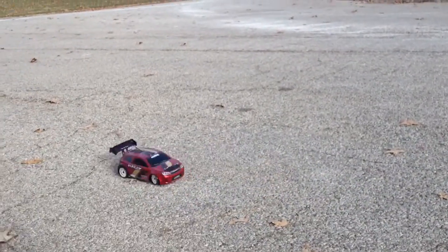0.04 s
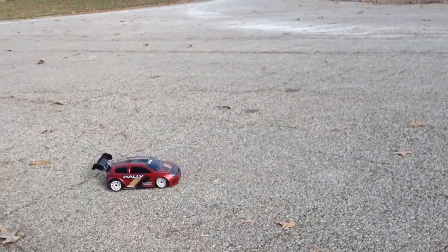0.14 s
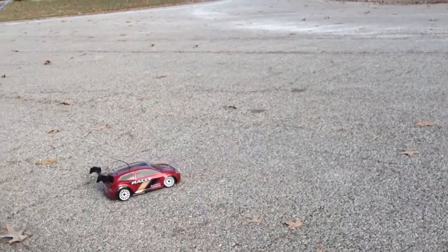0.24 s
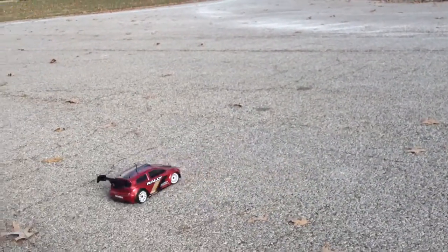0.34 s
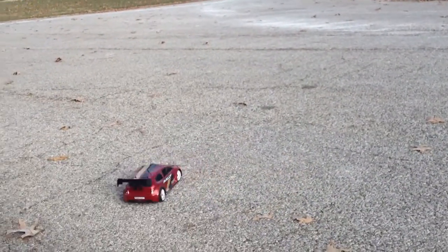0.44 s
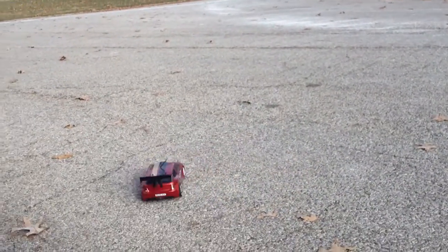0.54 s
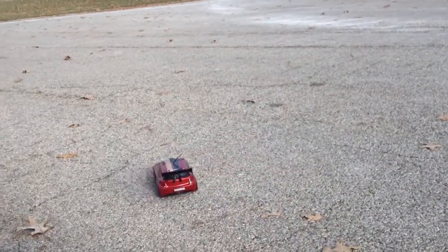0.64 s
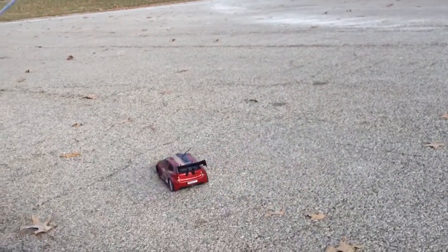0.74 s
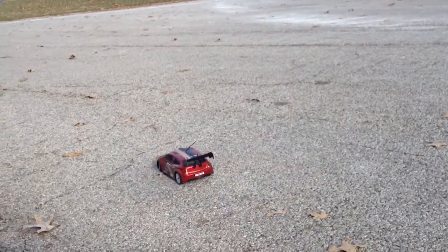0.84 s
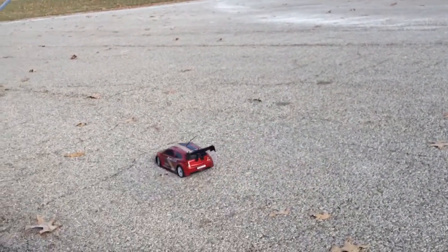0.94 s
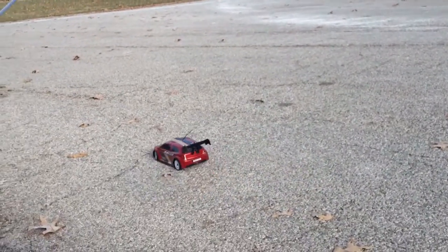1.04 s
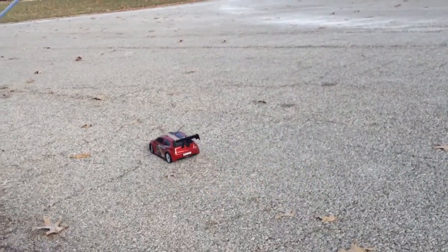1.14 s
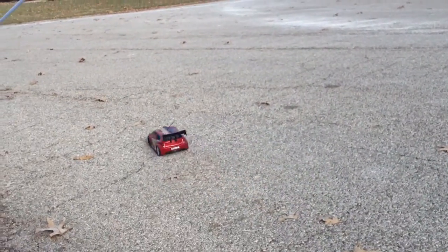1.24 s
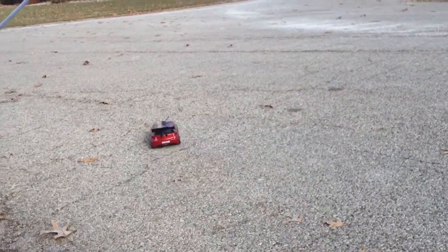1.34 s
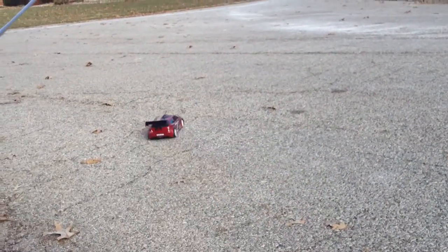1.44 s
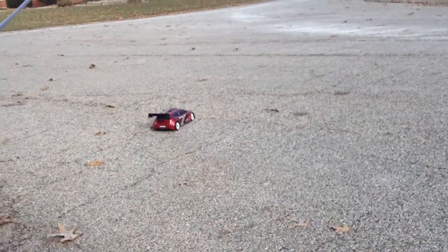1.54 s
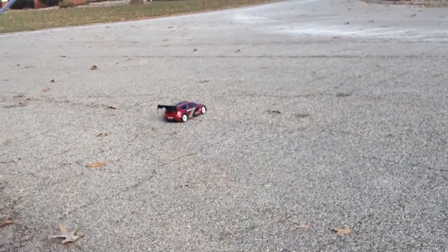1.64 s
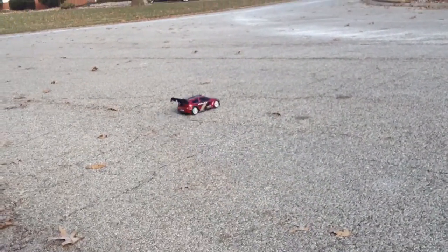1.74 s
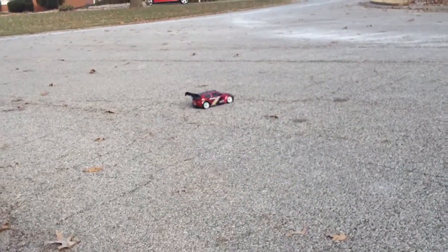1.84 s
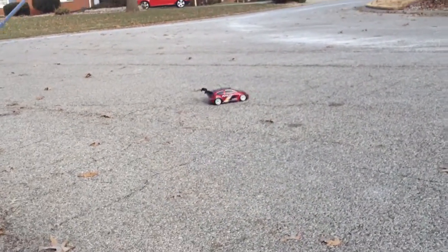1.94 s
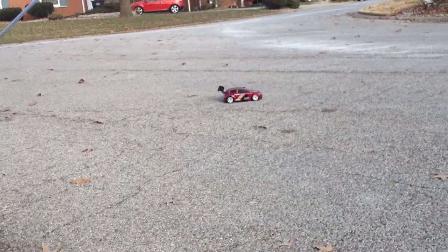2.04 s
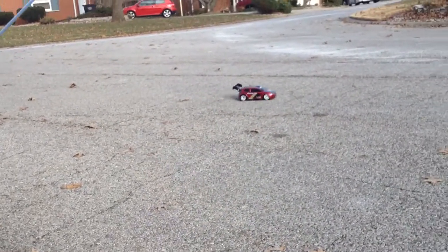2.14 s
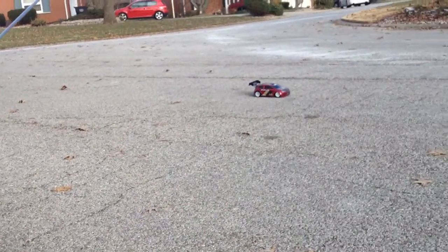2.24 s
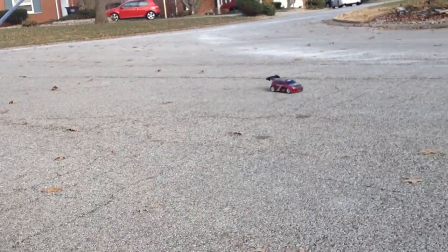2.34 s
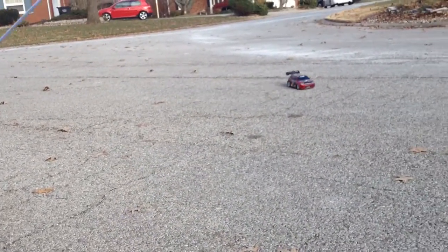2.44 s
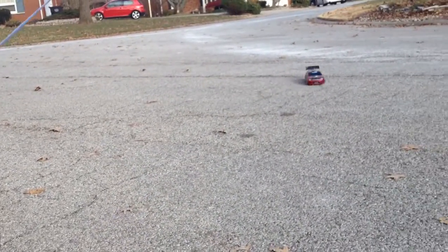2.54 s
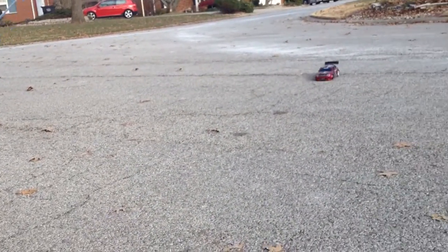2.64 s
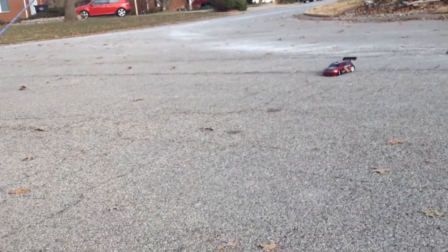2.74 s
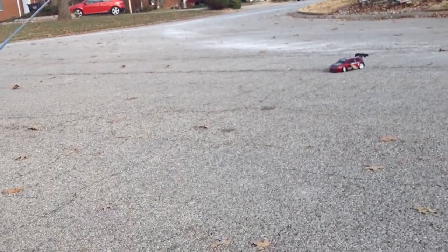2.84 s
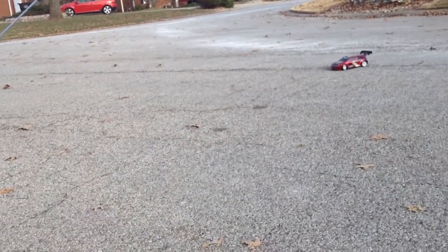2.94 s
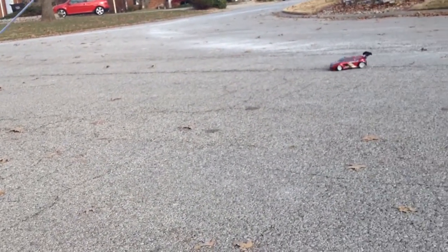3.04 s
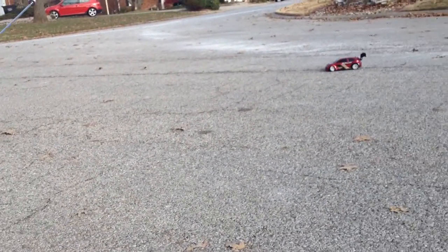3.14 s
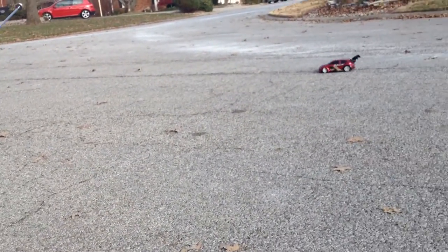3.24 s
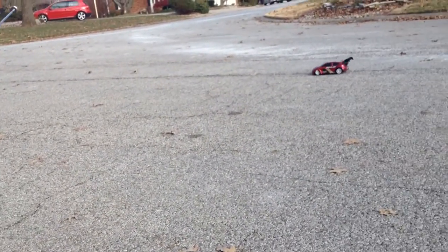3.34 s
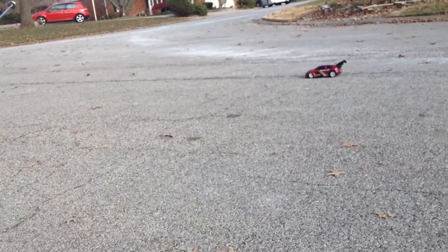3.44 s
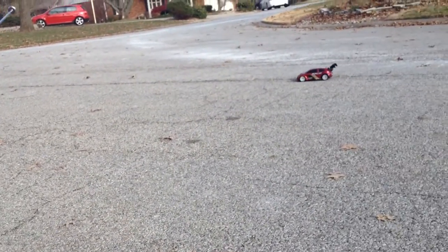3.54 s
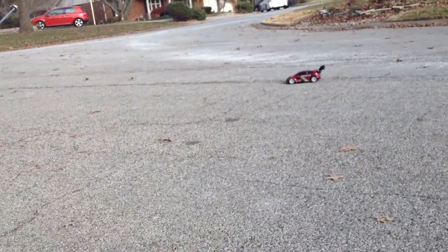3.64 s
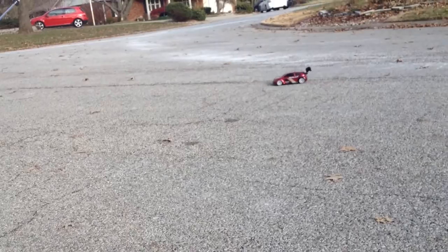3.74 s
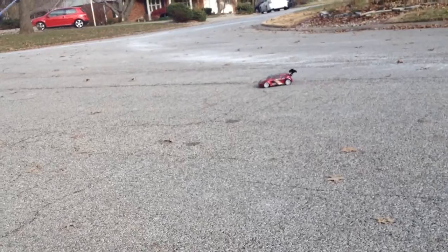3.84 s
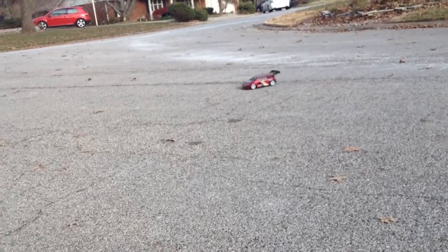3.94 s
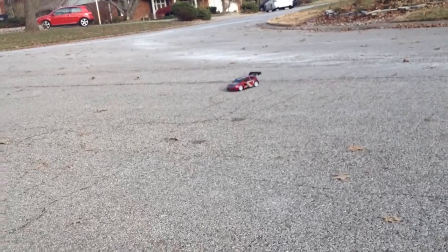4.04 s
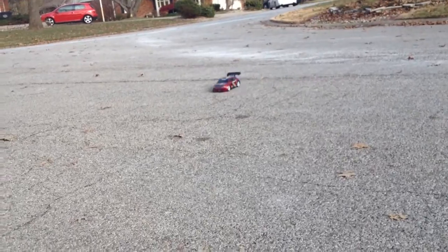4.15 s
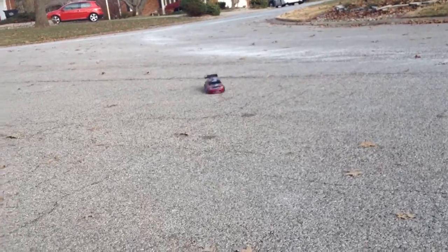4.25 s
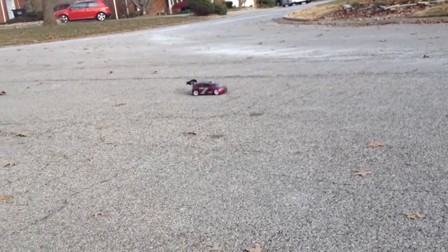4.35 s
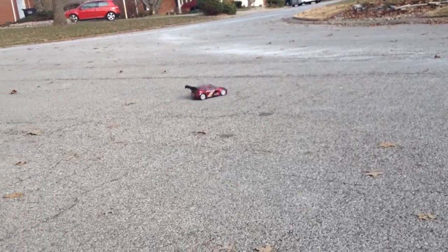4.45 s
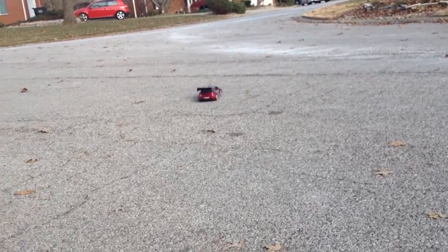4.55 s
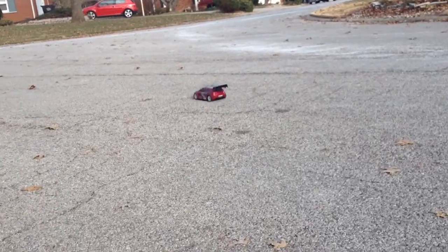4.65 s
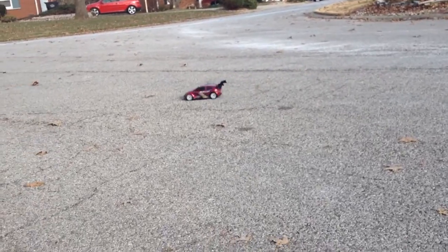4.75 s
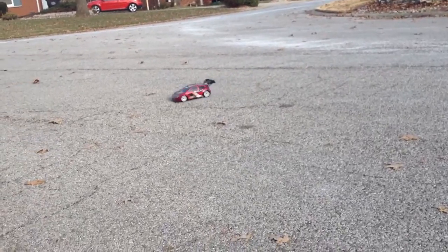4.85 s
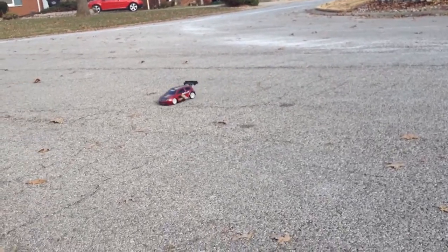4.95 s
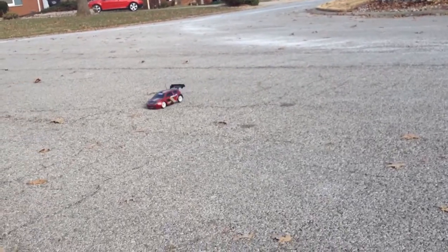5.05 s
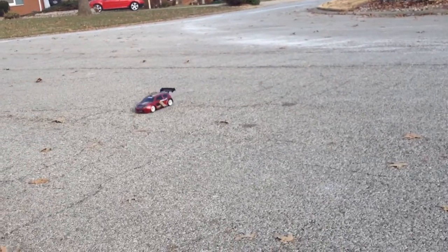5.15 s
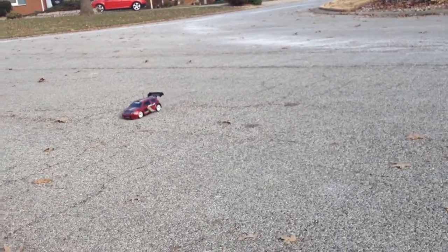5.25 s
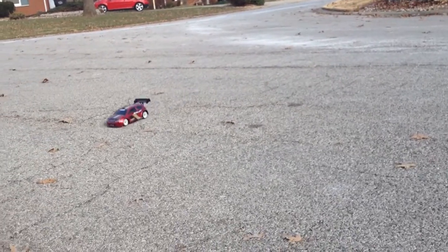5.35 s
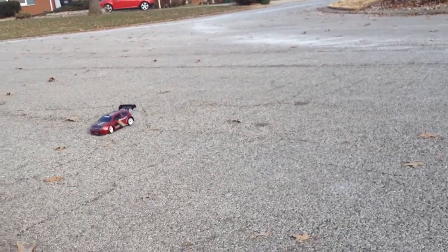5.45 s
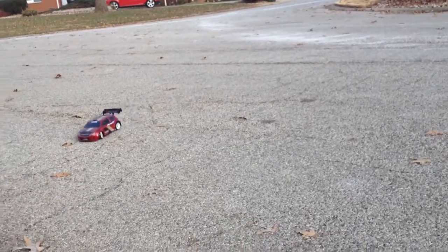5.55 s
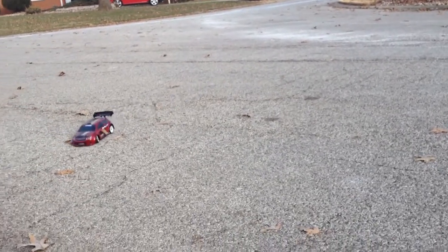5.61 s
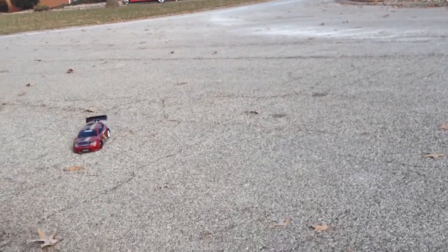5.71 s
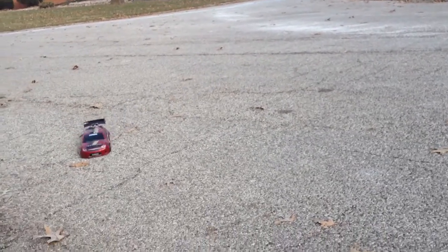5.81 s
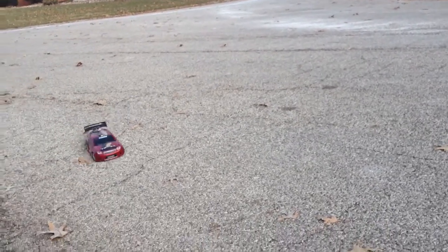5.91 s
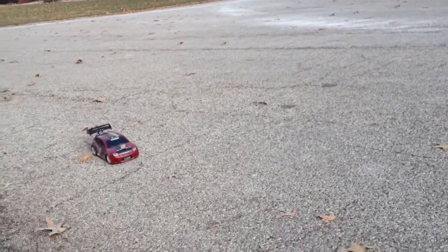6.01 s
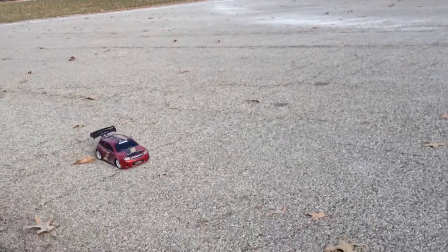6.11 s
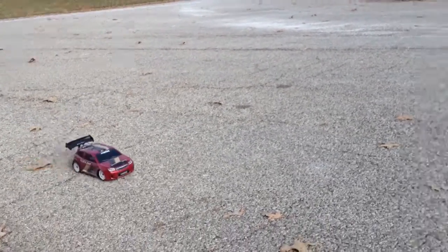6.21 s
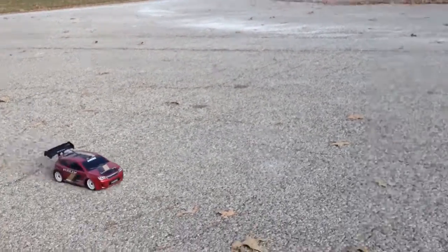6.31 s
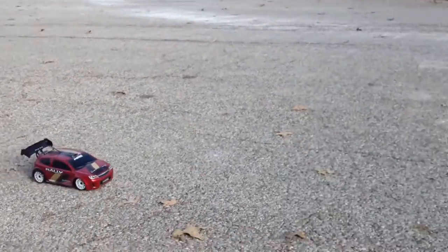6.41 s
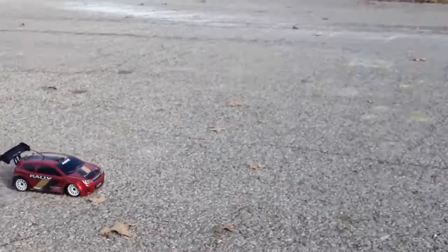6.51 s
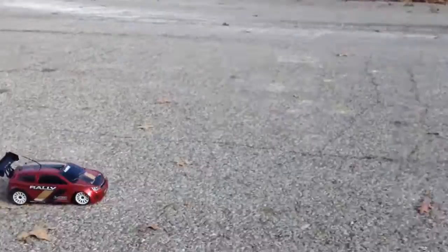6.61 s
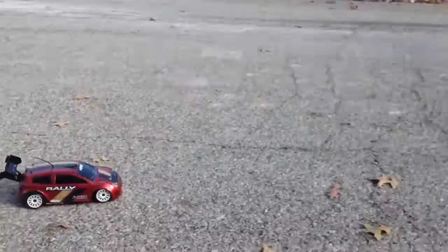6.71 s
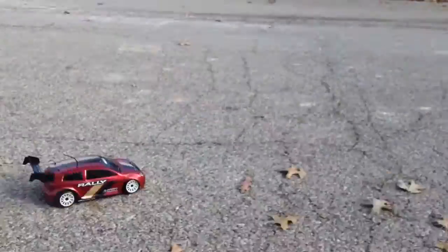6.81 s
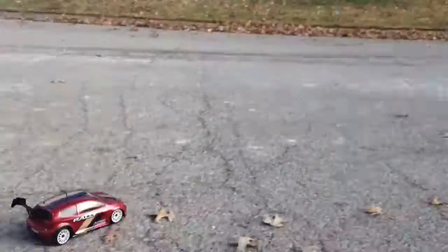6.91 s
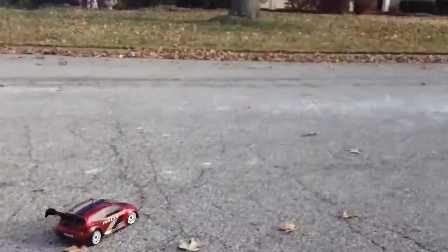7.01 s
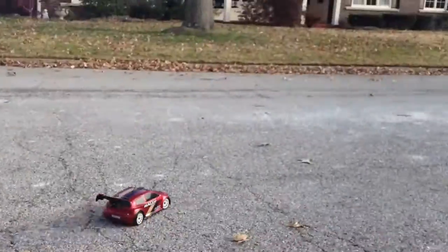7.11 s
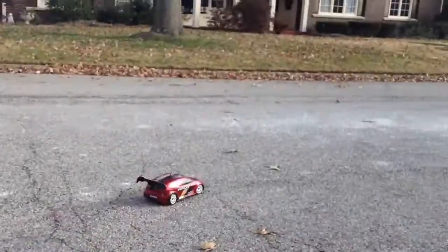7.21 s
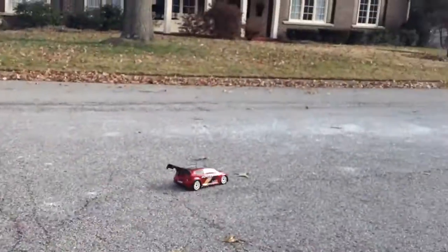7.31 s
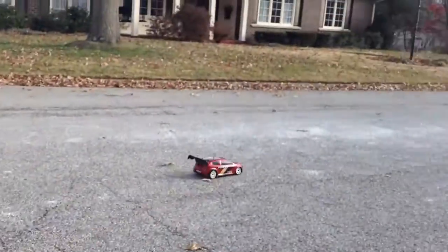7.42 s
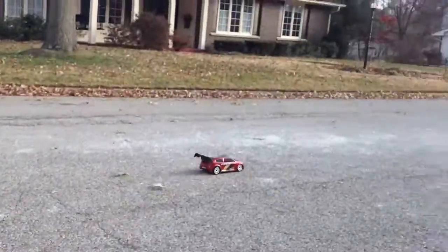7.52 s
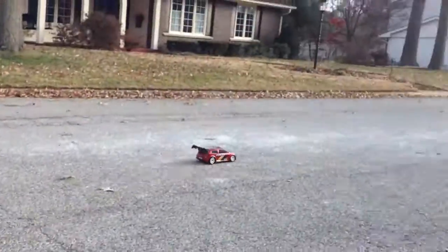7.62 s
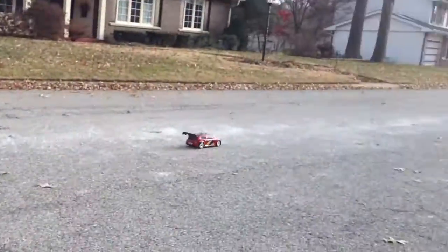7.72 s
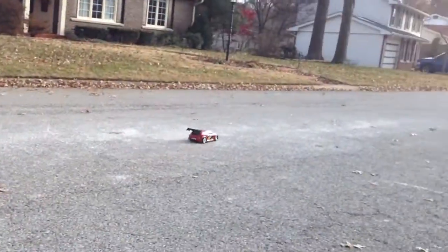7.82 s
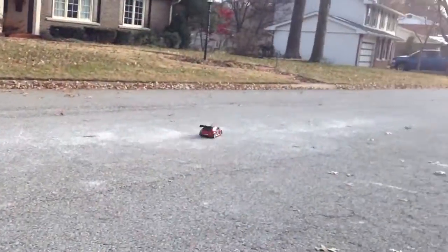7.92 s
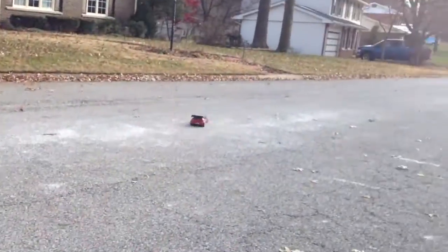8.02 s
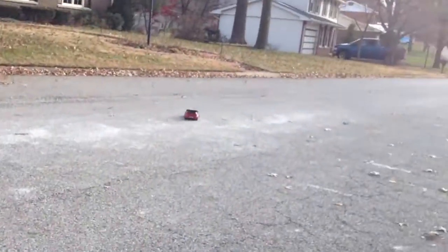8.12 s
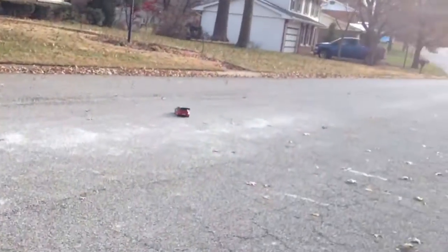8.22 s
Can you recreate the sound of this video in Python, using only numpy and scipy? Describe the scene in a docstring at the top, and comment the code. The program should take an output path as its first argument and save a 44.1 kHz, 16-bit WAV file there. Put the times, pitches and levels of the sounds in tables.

```python
"""A small electric model car drifts in loops on gravelly asphalt, over a faint outdoor hush.
It starts close by, tyres hissing and flinging grit, gears whining through a thin plastic shell and
pulsing as a drive shaft binds. By 3 s it is some metres off and its gears snatch again and again.
At 5 s the motor slows sharply, then the car just rolls with a low drone. Near 7 s it passes closest
in another spray of grit, then speeds away, its chassis knocking on bumps."""
import sys
import numpy as np
from scipy import signal
from scipy.fft import rfft, irfft
from scipy.io import wavfile
from scipy.ndimage import uniform_filter1d, map_coordinates

SR = 44100
rng = np.random.default_rng(int(sys.argv[2]) if len(sys.argv) > 2 else 0)


def materialize(psi):
    """Save the field psi as 16-bit PCM at rate SR to the path in sys.argv[1].

    A 1-D psi becomes a single channel; in a 2-D psi each row is a channel.
    """
    bounded = np.clip(np.atleast_2d(psi).T, -1, 1)
    quanta = np.round(bounded * 32767).astype(np.int16)
    wavfile.write(sys.argv[1], SR, quanta)


N = 364704
T = np.arange(N) / SR


# The gears' tones. Each row: multiple of the mesh rate (how often teeth meet), level in dB.
GEAR_TONES = [(2, 1), (3, -10.5), (4, 4.5)]
# How the hollow under the body rings. Each row: pitch in Hz, width in Hz, level in dB.
CABIN_RINGS = [(1778, 240, 4), (1918, 154, 8), (2070, 350, 2.5), (2400, 470, 3.5)]
# How the plastic shell rings. Each row: pitch in Hz, width in Hz, level in dB.
SHELL_RINGS = [(2610, 180, -1), (3615, 590, 2.5), (4110, 290, 4), (4360, 340, 7), (4587, 810, 2)]

def gears(teeth, pressure, cabin_db, whine_db):
    """Meshing teeth sing under pressure and slap when slack; both ring the cabin and the shell."""
    # each tone flickers as the gears shift on their shafts, and swells and fades as the body turns
    mesh = sum(undb(db + 0.71 * walk(35) + 3.2 * walk(10)) * tone(teeth, k, rough=1.3, rough_rate=400)
               for k, db in GEAR_TONES)
    mesh = highpass(mesh, 3000, order=4)  # the small gearbox passes on little of the low tones
    slaps = rng.standard_normal(N) * (1 + 0.5 * np.cos(2 * np.pi * teeth))
    # play between the teeth smears the two lowest tones over the cabin's pitches
    backlash = tone(teeth, 1, rough=1.9, rough_rate=400)
    backlash += undb(-2.5) * tone(teeth, 2, rough=1.1, rough_rate=500)
    cabin = ring(pressure * backlash + undb(-1.5) * slaps, CABIN_RINGS)
    shell = ring(pressure * mesh + undb(7) * slaps, SHELL_RINGS)
    return undb(cabin_db) * cabin + undb(whine_db) * shell


# Throttle or brake loads the gears. Each row: start and end in seconds, change of pressure in dB.
GEAR_LOADS = [(-.1,.14,2),(.4,.95,-3),(2.78,3.04,6.5),(4.08,4.62,2.5),(4.76,4.98,6),(5.25,5.5,3),(6.2,6.41,6),(6.55,7.12,2),(7.45,8.4,-4.5)]

def gear_drive(speed_db, drift_db, flank):
    """Tooth pressure and gear levels: the cabin is loudest from the side, the whine from the ends."""
    pull_db = spells(GEAR_LOADS, ramp_s=0.058)
    # each walk sways the level by about 1 dB as the car wags on its springs
    cabin_db = -57 + drift_db + 0.24 * speed_db + 16.5 * flank + walk(9)
    whine_db = -42 + drift_db + 0.76 * speed_db - 6 * flank + 0.77 * pull_db + walk(9)
    return undb(pull_db - 3.5), cabin_db, whine_db


# Each row: start and end in seconds, multiple of the mesh rate, level in dB.
SINGING_TONES = [(-.1,0.131,2,-36),(.22,0.375,2,-45.5),(.5,.6,2,-48),(1.045,1.27,4,-51.5),(1.742,2.034,2,-52),(1.46,1.9,4,-60),
                 (2.475,2.89,2,-51),(2.917,3.05,2,-52.5),(2.96,3.675,1,-51),(3.268,3.601,2,-53.5),(4.082,4.317,2,-50.5),(5.152,5.294,3,-54),
                 (5.282,5.496,2,-53),(5.7,6,3,-66),(6.004,6.197,3,-52.5),(6.185,6.345,2,-46.5),(6.53,6.801,2,-52.5),(6.884,7.75,2,-52)]

def singing(teeth):
    """Single gear tones stand out as the body turns, fluttering as the shafts shift."""
    multiples = sorted({round(row[2]) for row in SINGING_TONES})
    tones = {k: tone(teeth, k, rough=1.25, rough_rate=270) for k in multiples}
    flutter = even(undb(1.6 * walk(60)))
    return flutter * sum(undb(db) * gate(start, end, ramp_s=0.019) * tones[round(k)]
                         for start, end, k, db in SINGING_TONES)


# Panels that ring out. Each row: start and end in seconds, pitch in Hz, width in Hz, level in dB.
PANEL_FLARES = [(-.1,.24,3120,300,-53),(0.402,0.787,4000,330,-47),(0.497,.95,2600,260,-57),(0.802,1.382,4060,280,-56),(1.396,1.778,3914,170,-52.5),(5.4,6.103,3500,200.2,-60.5),(6.544,6.8,4583,300,-51),(6.82,8.14,3977,200,-55)]

def flares():
    """As the body turns and flexes, one shaken panel or another rings at its own pitch."""
    shaking = rng.standard_normal(N)
    return sum(undb(db) * gate(start, end, ramp_s=0.045) * unit(steep_band(shaking, hz, width, 2))
               for start, end, hz, width, db in PANEL_FLARES)


# The teeth's high overtones. Each row: multiple of the mesh rate, level in dB.
RASP_TONES = [(4, -0.5), (6, -2.5), (8, 1)]
# How well the gearbox gives them off. Each row: frequency in Hz, level in dB.
GEARBOX_COLOUR = [(4200, -2), (5200, 2), (7000, 5.5), (8800, 7), (10000, -1), (15000, -5)]

def rasp(teeth):
    """The high overtones of the teeth, smeared into a gritty sizzle."""
    overtones = sum(undb(db + 3.5 * walk(70)) * tone(teeth, k, rough=2, rough_rate=850)
                    for k, db in RASP_TONES)
    return colour(overtones, GEARBOX_COLOUR)


def rotor(teeth, speed, rumble_db):
    """The rotor hums nearly an octave under the mesh, its unbalance growing with speed."""
    return undb(rumble_db - 12) * speed ** 2 * tone(teeth, 0.55, rough=0.99, rough_rate=120)


# The drive shaft follows its wheel's own pace. Each row: time in seconds, turns a second.
SHAFT_RATE = [(0,71),(.55,52.4),(1,47),(1.45,35.5),(1.85,58),(2.05,39),(2.3,27),(2.75,47),(3,40.5),(3.35,30),(3.7,22.8),(4,38),(4.6,60),(4.9,42),(5.5,33),(6.75,29),(6.95,45.6),(8.27,55)]

def binds():
    """The shaft sticks and lets go once a turn, giving short pulses of uneven strength."""
    rate, = curves(SHAFT_RATE)
    turns = np.cumsum(rate * (1 + 0.025 * walk(25.12))) / SR
    strength = undb(3.5 * np.clip(rng.standard_normal(1000), -2, .5))
    width_turns = 0.13
    return strength[turns.astype(int)] * np.exp(-.5 * ((turns % 1 - .5) / width_turns) ** 2)


# The gears grab hard as the load turns over. Each row: time in seconds, strength in dB.
GEAR_SNATCHES = [(.065,6.5),(2.983,7),(3.163,13),(3.222,11),(3.315,11),(3.461,9),(3.539,12),(3.582,12.5),(3.626,11.5),(3.671,17),(4.299,12),(4.395,9),(4.762,8),(4.798,5),(4.836,10),(4.914,10.5),(4.959,11.5),(6.778,11.5),(6.97,8),(7.018,12.5),(7.051,10)]

def snatches():
    """Each snatch gives a brief lift, a slack spell around it and a clack just before the teeth bite."""
    half_s, lift_s, slack_s, clack_s = 0.05, 0.0034, 0.02, 0.003
    t = np.arange(-half_s, half_s, 1 / SR)
    lift_db = strikes(GEAR_SNATCHES, np.exp(-.5 * (t / lift_s) ** 2), half_s)
    slack = strikes([(s, 1) for s, _ in GEAR_SNATCHES], np.exp(-(t / slack_s) ** 4), half_s)
    decay = np.exp(-(t + half_s) / clack_s)
    hits = strikes([(s, undb(db)) for s, db in GEAR_SNATCHES], decay, lead_s=0.0033)
    clacks = undb(-50) * hits * colour(rng.standard_normal(N), HISS_COLOUR)
    return lift_db, np.minimum(slack, 1), clacks


# The tyres' bright hiss and the road's low rumble. Each row: frequency in Hz, level in dB.
HISS_COLOUR = [(150, -37), (900, -51), (1500, -8), (2800, 4), (5200, 2), (6500, 2.5), (8500, 0.5),
               (10500, -6), (14000, -7), (15500, -12.5)]
RUMBLE_COLOUR = [(40, -74), (90, -41), (150, -4.5), (250, 0), (390, -6.5), (590, 6.5), (780, 1),
                 (1050, 2.5), (1400, 1.5), (2200, -1), (4000, -11.5), (12000, -20.5)]

def tyres(speed, hiss_db, rumble_db, scuff):
    """Hard tyres scrape over grit, more stones a second at speed; the rough road drums the chassis."""
    scrape = rng.standard_normal(N) + undb(-3) * grit(2500 * speed, spread_db=1.5)
    drumming = rng.standard_normal(N) + undb(-3) * grit(900 * speed, spread_db=2.2)
    hiss = undb(hiss_db) * colour(scrape, HISS_COLOUR) * unit(scuff ** 1.54)
    rumble = undb(rumble_db) * colour(drumming, RUMBLE_COLOUR) * unit(scuff ** 1.2)
    return hiss + rumble


# Bumps in the road. Each row: time in seconds, thud level in dB, crack level in dB, thud pitch in Hz.
ROAD_BUMPS = [(2.014, -30, -38, 995), (2.804, -47, -42, 1203), (2.822, -37, -30, 323),
              (4.205, -41.5, -53, 556), (4.298, -36, -47, 249.4), (4.309, -31, -31.5, 636),
              (4.774, -30.5, -34, 834), (5.467, -39.5, -37, 598), (5.61, -42.5, -41, 298.4),
              (6.308, -35.5, -40, 401), (6.368, -24, -18.5, 895), (6.471, -37.5, -47, 360.8),
              (6.594, -37.5, -34, 312.7), (7.286, -29, -26, 1203), (7.311, -29.5, -28.5, 487),
              (7.939, -35, -34, 644), (7.957, -18.5, -24.5, 914), (7.993, -40, -32, 1300),
              (8.060, -34.5, -50, 650)]
# How the chassis rings. Each row: pitch in Hz, level in dB, seconds to fade by 60 dB.
CHASSIS_RINGS = [(295, -9.5, 0.041), (462, -6.5, 0.087), (630, -7, 0.083), (954, -0.5, 0.018),
                 (1130, -8.5, 0.078), (1430, 5, 0.0046), (2180, 15.5, 0.0025)]

def bumps():
    """Each blow rings the chassis most near its own pitch and sets the plastic shell clattering."""
    rise_s, crack_s, clatter_s, db_per_octave = 0.00058, 0.0032, 0.016, 9
    out, t = np.zeros(N + SR), T[:SR // 5]
    crack_band = signal.butter(1, [1500, 5500], "band", fs=SR, output="sos")
    onset = 1 - np.exp(-t / rise_s)  # the springs soften the contact
    decay = np.exp(-t / crack_s) + undb(-7.5) * np.exp(-t / clatter_s)
    for s, thud_db, crack_db, pitch_hz in ROAD_BUMPS:
        thud = np.zeros(len(t))
        for k, (hz, db, fade_s) in enumerate(CHASSIS_RINGS):
            detune = 1 + 0.09 * rng.standard_normal()
            gain = (-1) ** k * undb(db - db_per_octave * abs(np.log2(hz / pitch_hz)))
            thud += gain * np.sin(2 * np.pi * hz * detune * t) * undb(-60 * t / fade_s)
        crack = signal.sosfilt(crack_band, rng.standard_normal(len(t))) * onset * decay
        blow = undb(thud_db) * thud / abs(thud).max() + undb(crack_db) * crack / abs(crack).max()
        start = int(s * SR)
        out[start:start + len(t)] += blow
    return highpass(out[:N], 170, order=2)  # so small a body gives off no deep bass


# Wheelspins close by. Each row: start and end in seconds, level in dB.
WHEELSPINS = [(-.1, 0.464, -50.5), (6.587, 7.446, -48)]

def spray():
    """Spinning wheels fling fine grit in a bright crackle."""
    crackle = unit(highpass(grit(6000, spread_db=.5), 9000, order=2))
    return crackle * sum(undb(db) * gate(start, end, ramp_s=0.19) for start, end, db in WHEELSPINS)


# Stones flicked against the shell. Each row: time in seconds, level in dB.
STONE_HITS = [(5.966,-41),(6.198,-42),(6.34,-29),(7.455,-33),(7.499,-29)]

def stones():
    """Single stones strike the shell with bright, dry ticks."""
    decay_s, pitch_hz = 0.0018, 8800
    ticks = strikes([(s, undb(db)) for s, db in STONE_HITS], np.exp(-T[:SR // 20] / decay_s), lead_s=0)
    return ticks * band(rng.standard_normal(N), pitch_hz, pitch_hz / 2)


# How the loose panels ring. Each row: pitch in Hz, width in Hz, level in dB.
LOOSE_PANELS = [(1518, 110, 0), (2320, 120, -0.5), (3360, 440, 0.5), (4005, 410, 3)]

def rattle(metres, flank):
    """Stones under the tyres shake the loose panels, which ring at their own pitches at any speed."""
    shaking = grit(900, spread_db=-1) + rng.standard_normal(N)
    panels = sum(undb(db) * steep_band(shaking, hz, width, 3) for hz, width, db in LOOSE_PANELS)
    return undb(-50.5 - 5 * flank) * unit(panels) / metres


def metal(metres, flank, speed):
    """The shaking drive train keeps one thin metal ring alive, heard best at speed and from the side."""
    ringing = steep_band(rng.standard_normal(N), hz=1706, width_hz=14.3, skirt=4)
    return undb(-62 + 9.5 * flank) * unit(ringing) * speed ** 2 / metres


# Between drifts the car just rolls. Each row: start and end in seconds, change of gears and hiss in dB.
ROLLING = [(4.933,6.198,-5.5)]
ROLL_RAMP_S = 0.35

def drone(metres):
    """While the car rolls, its gripping tyres drum low on the rough road."""
    rolling = sum(gate(start, end, ROLL_RAMP_S) for start, end, _ in ROLLING)
    road = rng.standard_normal(N) + grit(150, spread_db=3)
    drum = steep_band(road, hz=299.7, width_hz=186, skirt=2)
    return undb(-58) * unit(drum) * rolling / metres


# The first echo shifts as the car moves. Each row: time in seconds, delay in milliseconds.
ECHO_DELAY = [(0, 1.235), (2.3, 1.22), (5.1, 1.28), (5.65, 1.2), (6.6, 1.2), (7, 0.92), (8.27, 0.87)]

def reflections(car, metres):
    """Quick echoes colour the sound as the car moves; house fronts add a thin tail."""
    lag_ms, = curves(ECHO_DELAY)
    # sound bounces between chassis and road, on a path that changes as the car turns
    car = car + undb(-11.5) * echo(car, 0.5436 + 0.11 * walk(2))
    echoes = undb(-10) * echo(car, lag_ms) + undb(-12.5) * echo(car, lag_ms + 2.3)
    share = np.minimum(metres / 2.6, 1)  # close by, the direct sound outweighs the echoes
    t = T[:SR]
    tail = signal.lfilter(*signal.butter(1, 4000, fs=SR), rng.standard_normal(SR))
    tail *= undb(-60 * t) * (t > .03)  # starts after 30 ms, fades 60 dB in a second
    street = signal.fftconvolve(car, tail / np.linalg.norm(tail))[:N]
    return car + share * echoes + undb(-19) * street


# The outdoor hush and the traffic's low hum. Each row: frequency in Hz, level in dB.
HUSH_COLOUR = [(25, -38), (85, -18.5), (125, -6), (170, 0), (400, -11), (1000, -12.5), (15000, -55)]
HUM_COLOUR = [(40, -60), (108, -1), (200, -35.5)]
# Far traffic swells and fades. Each row: time in seconds, level in dB.
TRAFFIC_LEVEL = [(0, -71.5), (1.5, -70), (2.3, -80), (4, -82), (7.1, -74), (8.27, -87)]

def outdoors():
    """A soft hush and the hum of far traffic."""
    hum_db, = curves(TRAFFIC_LEVEL)
    hush = undb(-64 + walk(2.8)) * colour(rng.standard_normal(N), HUSH_COLOUR)
    return hush + undb(hum_db) * colour(rng.standard_normal(N), HUM_COLOUR)


def tone(teeth, multiple, rough, rough_rate):
    """A tone that follows the gears; uneven teeth and the play between them roughen it."""
    phase = 2 * np.pi * multiple * teeth
    return unit((1 + rough * walk(rough_rate)) * np.sin(phase) + rough * walk(rough_rate) * np.cos(phase))


def ring(x, rings):
    """A part of the body rings with whatever shakes it, at a steady level."""
    return even(sum((-1) ** k * undb(db) * band(x, hz, width) for k, (hz, width, db) in enumerate(rings)))


def grit(rate, spread_db):
    """Clicks of stones met at random, rate a second, some harder than others."""
    hit = rng.random(N) < rate / SR
    size = undb(spread_db * np.minimum(rng.exponential(size=N), 5))
    return unit(hit * size * rng.standard_normal(N))


def undb(db):
    """Turn decibels into a gain."""
    return 10 ** (np.asarray(db) / 20)


def unit(x):
    """Scale to an average (rms) level of 1."""
    return x / np.sqrt(np.mean(x ** 2))


def even(x):
    """Hold the level at 1 over every eighth of a second, keeping the faster flutter."""
    return x / np.sqrt(uniform_filter1d(x ** 2, SR // 8) + 1e-12)


def curves(table):
    """Join a time table's points with lines, one curve for each column after the time."""
    times, *columns = np.transpose(table)
    return [np.interp(T, times, column) for column in columns]


def walk(rate):
    """A smooth random wobble of size 1, changing about rate times a second."""
    knots, times = rng.standard_normal(N // 8), np.linspace(0, T[-1], N // 10)
    return unit(np.interp(T, times, map_coordinates(knots, [times * rate], order=2)))


def gate(start, end, ramp_s):
    """Ramp up to 1, hold, ramp down."""
    return np.clip(np.minimum(T - start, end - T) / ramp_s + .5, 0, 1)


def spells(table, ramp_s):
    """The dB of each (start, end, dB) row while it lasts."""
    return sum(db * gate(start, end, ramp_s) for start, end, db in table)


def strikes(rows, shape, lead_s):
    """A copy of the shape for each (seconds, size) row, starting lead_s early."""
    out = np.zeros(N + SR)
    for s, size in rows:
        start = max(int((s - lead_s) * SR), 0)
        out[start:start + len(shape)] += size * shape
    return out[:N]


def colour(x, points):
    """Shape lows and highs along (Hz, dB) points, then scale to level 1."""
    hz, db = np.transpose(points)
    freqs = np.maximum(np.fft.rfftfreq(N, 1 / SR), 1)
    return unit(irfft(rfft(x) * undb(np.interp(np.log(freqs), np.log(hz), db)), N))


def band(x, hz, width_hz):
    """Keep the sound around one pitch."""
    return signal.lfilter(*signal.iirpeak(hz, hz / width_hz, fs=SR), x)


def steep_band(x, hz, width_hz, skirt):
    """A band with its edges trimmed by a second one, skirt times as wide."""
    return band(band(x, hz, width_hz), hz, skirt * width_hz)


def highpass(x, hz, order):
    """Keep the sound above hz."""
    return signal.sosfilt(signal.butter(order, hz, "high", fs=SR, output="sos"), x)


def echo(x, lag_ms):
    """A copy that arrives later by a moving delay."""
    return map_coordinates(x, [(T - lag_ms / 1000) * SR], order=3)


# The motor's speed. Each row: time in seconds, mesh rate in Hz.
MESH_RATE = [(0,1990),(.28,2020),(.5,1620),(.78,1363),(1.08,1215),(1.42,1087),(1.62,1245),(1.75,1500),(2,1930),(2.5,2260),(2.78,2298),(2.9,2162),(2.93,1975),(3.45,1920),(3.75,1700),(3.97,1665),(4.12,1850),(4.26,1907),(4.35,1804),(4.58,2222),(4.79,2028),(4.91,1180),(5,620),(5.13,1220),(5.43,1950),(5.72,1500),(6.03,1325),(6.13,1400),(6.39,2396),(6.46,1047),(6.66,1590),(6.8,1785),(7.05,2115),(7.55,2385),(7.9,2416),(8.27,2660)]
# The car's loops. Each row: time in seconds, distance in metres, flank (0 nose-on, 1 side-on).
LOOPS = [(0,1.5,0.13),(.32,1.28,0.83),(.6,1.44,0),(1.06,1.35,0.73),(1.55,1.67,0.22),(2.1,2,0.69),(2.45,3.06,0.06),(2.75,3.3,0),(2.98,3.6,0.7),(4.03,2.88,0.98),(4.25,2.5,0.17),(4.6,2.12,0.6),(4.85,2.4,0.72),(5.45,2.76,0.48),(5.9,2.5,0.32),(6.4,1.57,0.15),(6.77,0.87,0.97),(6.9,0.83,0.3),(7.12,1.12,0.33),(7.5,1.74,0.32),(7.95,2.55,0.15),(8.27,3.8,0.25)]
# Cracked road drums the chassis harder. Each row: start and end in seconds, extra rumble in dB.
CRACKED_ROAD = [(6.25, 8.05, 2)]

def scene():
    """The motor speed drives gears and tyres alike; distance and heading set how they are heard."""
    mesh_hz, = curves(MESH_RATE)
    metres, flank = curves(LOOPS)
    speed = mesh_hz / 1800  # 1 is cruising
    near_db, speed_db = -20 * np.log10(metres), 20 * np.log10(speed)
    drift_db = near_db + spells(ROLLING, ROLL_RAMP_S)
    hiss_db = -43.5 + drift_db + 0.89 * speed_db
    rumble_db = -48 + near_db + 0.4 * speed_db + spells(CRACKED_ROAD, ramp_s=1)
    pressure, cabin_db, whine_db = gear_drive(speed_db, drift_db, flank)
    # binds pulse the rasp most and the tyres least; around a snatch the shaft runs free
    gear_pulse_db, rasp_pulse_db, tyre_pulse_db = 8, 18.5, 1
    lift_db, slack, clacks = snatches()
    throb = (0.45 + 0.55 * flank) * binds() * (1 - slack) + lift_db / gear_pulse_db
    # count the teeth that have met; slipping tyres make the speed tremble
    teeth = np.cumsum(mesh_hz * (1 + 0.00883 * walk(60))) / SR
    jolts = even(undb(walk(130)))  # the road shakes the whole car
    drive = gears(teeth, pressure, cabin_db, whine_db) + singing(teeth) + flares()
    drive *= even(undb(gear_pulse_db * throb))
    rasp_pulse = even(undb(rasp_pulse_db * np.minimum(throb, 1)))
    drive += undb(hiss_db - 7.5) * speed ** 0.54 * rasp_pulse * rasp(teeth)
    drive += rotor(teeth, speed, rumble_db)
    scuff = jolts * even(undb(tyre_pulse_db * throb))
    car = jolts * drive + scuff * (spray() + rattle(metres, flank))
    car += tyres(speed, hiss_db, rumble_db, scuff) + drone(metres)
    car += metal(metres, flank, speed) + clacks / metres + stones() + bumps()
    return (reflections(car, metres) + outdoors())[None]


def record(dry):
    """Cut the highest treble, above 15500 Hz."""
    return signal.sosfilt(signal.ellip(10, .2, 70, 15500, fs=SR, output="sos"), dry)


dry = scene()
out = record(dry)
materialize(out)
```